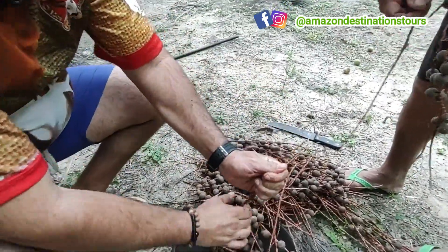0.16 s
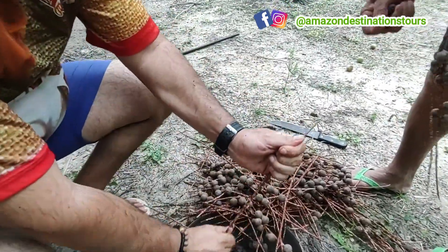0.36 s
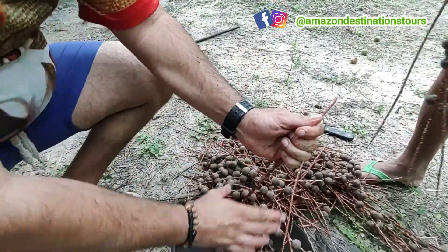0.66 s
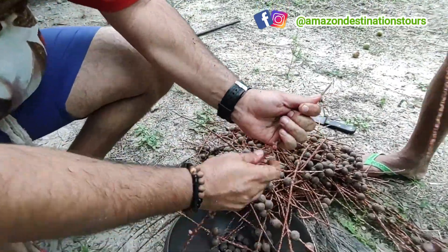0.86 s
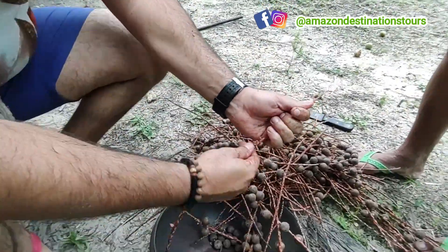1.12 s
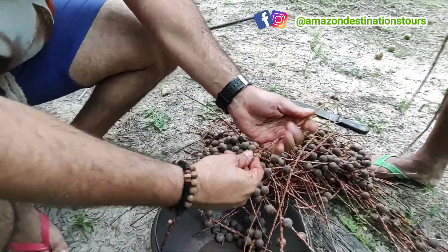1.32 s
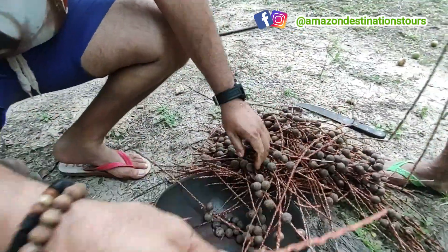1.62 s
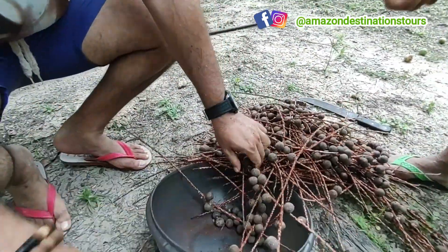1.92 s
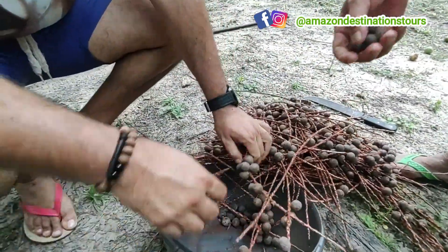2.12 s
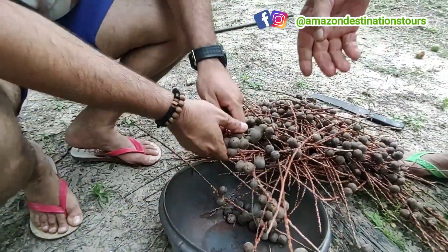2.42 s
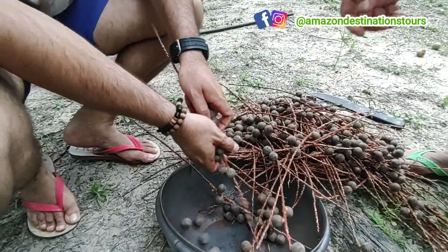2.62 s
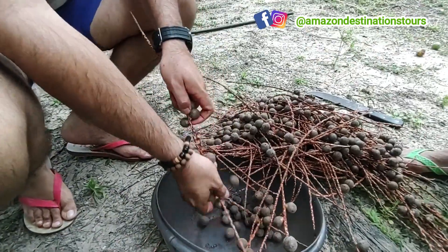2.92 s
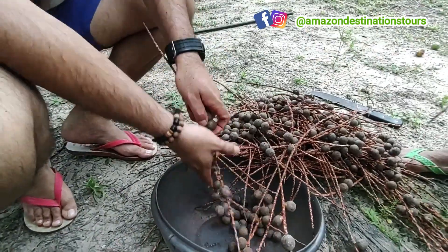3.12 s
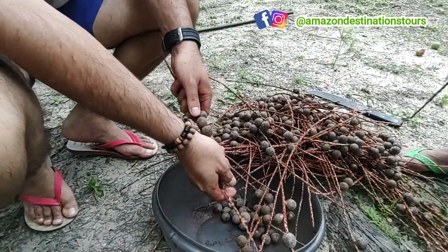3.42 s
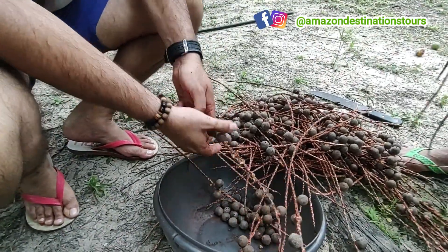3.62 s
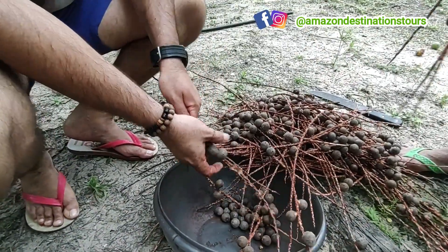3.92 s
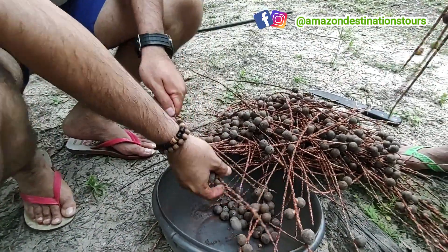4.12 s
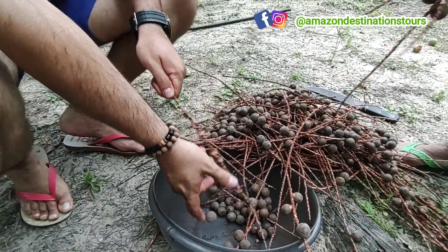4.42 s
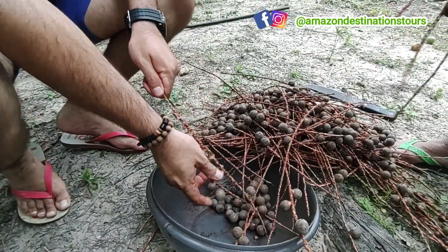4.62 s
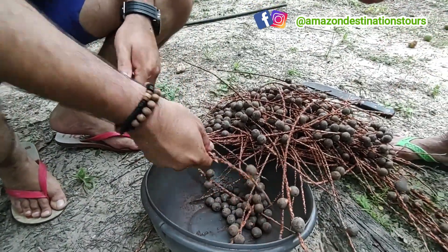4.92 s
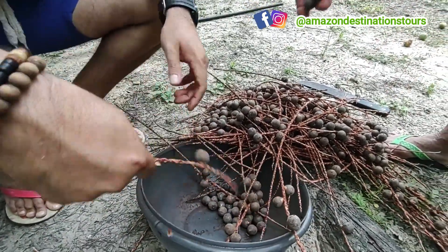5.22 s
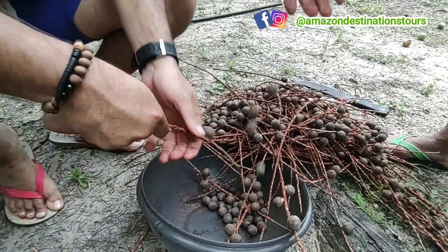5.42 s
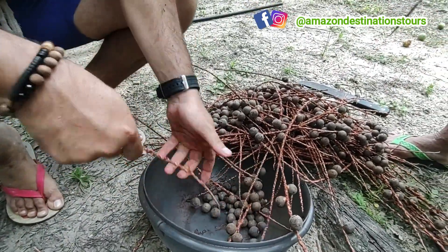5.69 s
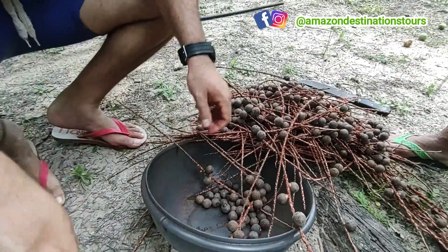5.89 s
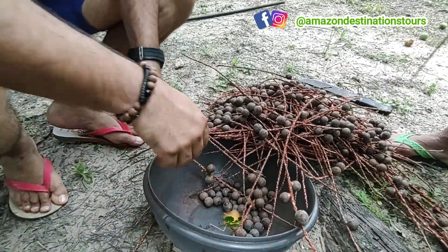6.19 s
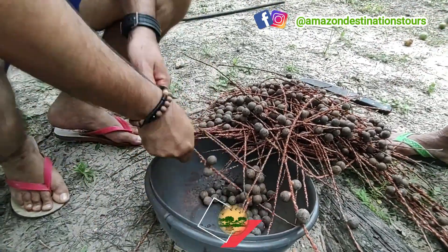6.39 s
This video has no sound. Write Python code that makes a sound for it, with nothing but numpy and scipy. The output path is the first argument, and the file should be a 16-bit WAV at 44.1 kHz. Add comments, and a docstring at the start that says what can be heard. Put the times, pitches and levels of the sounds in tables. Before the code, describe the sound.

Small hard fruits patter into a plastic bucket close by, each giving a short hollow knock, then bouncing and rolling. The first flurry runs from the start to about 0.7 seconds, with low handling thumps and a soft swish of stalk. A lull follows with a few small snaps, and a stalk taps and scrapes lightly over the rim around 1.8 seconds. A sharp snap and rasp come at 2.3. The longest shower of fruit falls from 2.6 to 3.7 seconds. Stalks swish and crackle around 4.2, then more fruits land from 4.6 to 5.1 and from 5.7 to 6.1, leaving a few faint ticks.

The hand-held stereo microphone has a finger over its left side, which sounds muffled, with rumble and small skin scratches; it opens briefly from about 1.6 to 2 seconds. Faint, distant outdoor air rustles throughout.

```python
"""Small hard fruits drop, bounce and roll in a plastic bucket, each landing ringing its wall.
They are stripped from a bunch by hand, outdoors: stalks snap and swish close to a hand-held stereo
recorder, one drags over the rim, and the open air rustles faintly far off. A finger covers the left
microphone port: that side is muffled and full of handling rumble, and opens for a moment when the
finger slides off."""
import sys
import numpy as np
from scipy import signal
from scipy.fft import rfft, irfft, next_fast_len
from scipy.io import wavfile
from scipy.ndimage import uniform_filter1d, map_coordinates

SR = 44100
rng = np.random.default_rng(int(sys.argv[2]) if len(sys.argv) > 2 else 0)


def unload_wav(signal):
    """Save mono or channel-first audio to the path in sys.argv[1] as 16-bit WAV at rate SR, clipped to [-1, 1]."""
    wavfile.write(
        sys.argv[1],
        SR,
        np.round(np.clip(np.atleast_2d(signal).T, -1, 1) * 32767).astype(np.int16),
    )


N = 288855

# Fruits landing. Each row: start in seconds, level in dB, favoured ring in Hz, hardness (treble) in dB.
LANDINGS = [(0.035, -17.5, 926, -1.5), (0.084, -23, 1190, 0.5), (0.11, -9, 1370, 2), (0.116, -14, 1180, 11),
            (0.127, -10.5, 1190, -6), (0.15, -8.5, 1000, 5), (0.184, -9, 1240, 4.5),
            (0.235, -22.5, 1070, 5.5), (0.255, -21, 940, 2.5), (0.265, -15.5, 1120, -2.5),
            (0.322, -22.5, 860, 2), (0.348, -12, 1330, -4.5), (0.356, -18.5, 1004, 6),
            (0.402, -25, 793, -4), (0.437, -20, 1150, 6), (0.459, -22, 950, -13), (0.616, -15.5, 1180, 0.5),
            (0.718, -14.5, 850, -7), (0.783, -37, 970, 1), (0.807, -38, 500, 2), (1.199, -38.5, 1730, 26),
            (2.606, -32, 1040, 8.5), (2.64, -20, 1230, 1), (2.655, -10, 760, -5.0), (2.682, -10, 1190, 7),
            (2.746, -20, 1220, -6), (2.754, -9, 878, 2), (2.801, -11.5, 1260, 0), (2.827, -20, 475, -11),
            (2.845, -28.5, 900, -14.5), (2.878, -30.5, 1150, -8), (2.893, -24, 920, -13.5),
            (2.939, -28.5, 455, -9.5), (2.959, -32.5, 920, 1.5), (3.016, -8, 850, 5.5),
            (3.039, -31.5, 703, 2.5), (3.067, -31.5, 681, -0.5), (3.113, -6, 852, 13),
            (3.124, -12.5, 866, -2), (3.173, -14.5, 785, -10), (3.193, -9.5, 983, 4),
            (3.271, -16.5, 986, -12), (3.308, -18.5, 860, -18.5), (3.331, -4, 900, 5),
            (3.352, -18, 780, -9), (3.382, -5, 876, -3), (3.421, -17, 760, -2), (3.449, -14, 970, -1),
            (3.474, -21.5, 880, 2), (3.486, -14, 944, -20.5), (3.521, -22, 1340, -18),
            (3.543, -22.5, 506, -8.5), (3.584, -14.5, 975, -21), (3.628, -17, 1290, 5.5),
            (3.655, -14.5, 1000, -13.5), (3.695, -29, 880, -22), (3.894, -36, 880, -23),
            (4.333, -22.5, 925, 0.5), (4.386, -28, 1150, -17), (4.549, -41, 774, -1),
            (4.611, -19.5, 1270, 16), (4.666, -28, 890, 0.5), (4.68, -7.5, 764, 11.5),
            (4.708, -16.5, 870, -5), (4.775, -19, 500, -5), (4.814, -19, 820, -32),
            (4.833, -25, 920, -16.5), (4.851, -15.5, 670, -6.5), (4.873, -4, 785, 12), (4.926, -24, 835, 2),
            (4.976, -19, 860, -11.5), (5.082, -18.5, 720, -20), (5.128, -23.5, 725, -23),
            (5.692, -19, 1340, 3), (5.702, -10, 1180, 7.5), (5.713, -15, 845, 11), (5.733, -14.5, 925, 3.5),
            (5.763, -16, 812, -7), (5.816, -14, 970, -4), (5.839, -20, 930, -0.5), (5.872, -11.5, 835, -29),
            (5.911, -15, 930, -18.5), (5.936, -14, 1270, -12.5), (5.961, -27.5, 890, -7),
            (6.015, -23.5, 1290, 3.5), (6.108, -33, 1235, -8), (6.151, -38, 840, -13),
            (6.452, -48, 810, -2), (6.477, -39.5, 873, -17)]
# The bucket's modes. Each row: pitch in Hz, level in dB, 60 dB decay in seconds (limited in bucket_ring).
BUCKET_MODES = [(234, 2.5, 0.013), (370, -8, 0.019), (489, 14, 0.037), (688, 3.5, 0.014), (926, 4.5, 0.024),
                (1250, 7, 0.013), (1770, 1, 0.0048), (2296, -8.5, 0.0033), (2840, -4.5, 0.0065),
                (3475, -9, 0.015), (4070, -33.5, 0.017)]
# Tone of a rounded contact on a small radiator. Each row: frequency in Hz, gain in dB.
CONTACT_TONE = [(40, -26.5), (160, -24), (230, -5), (300, -1.5), (2200, 10), (3300, -10), (4500, -5.5),
                (8000, -34.5)]
# Short sharp clicks: stalks snapping, and fruits cracking or ticking as they land.
# Each row: start in seconds, level in dB, woody part relative to that in dB.
SHARP_CLICKS = [(0.133, -40, 18.5), (0.151, -34, 0.5), (0.4102, -36, -8.5), (0.4325, -33, -11),
                (0.4579, -40, -23), (0.884, -52, 10.5), (1.016, -52.5, 9.5), (1.1987, -46, 8),
                (1.228, -38.5, -19), (1.853, -40.5, 0), (1.916, -43, -27), (2.28, -25.5, -3.5),
                (2.633, -37.5, -20.5), (2.701, -35.5, -20.5), (2.7934, -38, -8.5), (2.908, -32.5, -16),
                (2.9302, -36, -7), (2.954, -38.5, -10), (2.9786, -38, -18.5), (3.0826, -38, -22.5),
                (3.4707, -34.5, -0.5), (4.1476, -34, -8), (4.1684, -40.5, -14.5), (4.1898, -31.5, -26),
                (4.2061, -34, -25), (4.464, -45, -31), (4.8535, -35.5, -28), (5.1506, -43, 0.5),
                (5.671, -28, -20), (6.225, -52, 13), (6.245, -50.5, 11), (6.288, -52, 4.5)]
# Stalks pulled through fingers. Each row: loudest moment in seconds, level in dB, swell and fade in seconds.
STALK_PULLS = [(0.48, -49, 0.088, .2), (1.44, -62, 0.15, .27), (2.282, -45.5, .004, 0.06),
               (2.99, -45, .08, 0.18), (4.25, -48.5, 0.13, .2), (4.471, -56, 0.011, .12),
               (4.89, -50, .004, 0.16), (5.676, -50.5, 0.0043, .14), (6.27, -67, 0.047, .1)]
# Tone of the swish. Each row: frequency in Hz, gain in dB.
SWISH_TONE = [(1500, -31), (5000, -22), (9000, -25.5), (12000, -8), (14000, -6), (16000, -8)]
# A stalk tapping the rim. Each row: start in seconds, level in dB, favoured ring in Hz.
RIM_TAPS = [(1.748, -45, 950), (1.788, -41.5, 1260), (1.821, -42.5, 1330), (1.838, -41, 1370),
            (1.854, -43, 1420)]
# The finger on the left port. Each row: time in seconds, share covered from 0 to 1.
PORT_COVER = [(0, 1), (1.52, 0.99), (1.66, 0.032), (1.95, 0.083), (2.0, 0.94), (6.55, 0.98)]
# Sound let under the finger as its pressure changes. Each row: time in seconds, gain in dB.
FINGER_LEAK = [(0, -1), (.35, -4), (.72, 3.5), (2.6, 7.5), (2.82, 7.5), (3.0, 1.5), (3.4, 2), (4.7, -1),
               (4.87, 4), (5.0, -2)]
# The left port covered, then half freed. Each row: frequency in Hz, gain in dB.
COVERED_TONE = [(30, 0.5), (200, -2), (500, -6.5), (1500, -11.5), (2500, -21.5), (3300, -10), (5000, -25),
                (8000, -58), (16000, -42.5)]
FREED_TONE = [(300, 6.5), (3000, 6.5), (7000, -1), (16000, -15.5)]
# The hand shifting on the recorder. Each row: loudest moment in seconds, rumble level in dB.
HAND_SHIFTS = [(.03, -24), (.32, -30.5), (.37, -32), (.42, -17.5), (.64, -35), (1.18, -38.5), (1.45, -35.5),
               (1.57, -28), (2.86, -35.5), (3.78, -38.5), (4.41, -39.5), (4.83, -29.5), (4.97, -42),
               (5.19, -48.5), (5.73, -44.5), (6.11, -35.5)]
# Pushes of air trapped under the finger in the left port. Each row: start in seconds, level in dB, time
# constant in seconds.
PORT_PUSHES = [(0.315, -6.5, 0.00081), (0.363, -9.5, 0.00075), (0.559, -20, 0.0015), (0.894, -25.5, 0.0016),
               (0.946, -29, 0.0019), (1.085, -35, 0.0022), (1.165, -22.5, 0.0014), (1.339, -28, 0.001),
               (1.564, -19.5, 0.00046), (1.615, -17, 0.0012), (1.636, -17, 0.00036), (1.643, -3.5, 0.00044),
               (1.974, -33, 0.00057), (2.011, -32.5, 0.0031), (2.458, -29, 0.00043), (2.471, -18, 0.00018),
               (2.477, -17.5, 0.00036), (3.768, -23, 0.00062), (5.556, -42.5, 0.0025),
               (5.931, -14.5, 0.00066), (5.984, -18, 0.0018)]
# Tone of the rumble in the case. Each row: frequency in Hz, gain in dB.
CASE_TONE = [(15, -54.5), (45, -1.5), (80, 3), (130, -8), (220, -20), (400, -31.5), (1000, -40.5),
             (3000, -86.5)]
# Tone of the distant air. Each row: frequency in Hz, gain in dB.
AIR_TONE = [(20, -18.5), (80, -7), (200, -1), (1000, 2), (2200, -0.5), (3300, -5.5), (7000, -9.5),
            (12000, -12.5), (16000, -10)]


def fruit_landings():
    """Each fruit rings the bucket; a hard contact wakes the high modes and cracks."""
    wall, cracks = np.zeros((2, N)), np.zeros((2, N))
    for start, db, peak_hz, hard_db in LANDINGS:
        knock_db = -9 + 2 * rng.standard_normal()
        blow = bucket_ring(peak_hz, knock_db, hard_db, focus_db=7, spread_db=2, stereo_phase=1.1)
        add(wall, start - .001, amp(db) * blow)
        add(cracks, start, amp(db + 0.8 * hard_db - 21.5) * burst(t60_s=0.029, rise_s=0.001))
    crack_tone = [(300, -73), (2500, 7), (4000, 2), (8000, -13.5), (16000, -23.5)]
    return coloured(wall, CONTACT_TONE) + coloured(cracks, crack_tone)


def bucket_ring(peak_hz, low_db, high_db, focus_db, spread_db, stereo_phase):
    """One blow on the bucket at both ports; the spot hit sets one mode to peak_hz and weights it."""
    t = np.arange(SR // 8) / SR
    hz, db, t60 = np.transpose(BUCKET_MODES)[:, :, None]
    t60 = t60.clip(.01, .036)
    detune, scatter, phase = rng.standard_normal((3, len(hz), 1))
    nearest = np.argmin(np.abs(hz - peak_hz))
    hz = hz * (1 + 0.028 * detune)  # the load of fruit and the spot detune the wall
    hz[nearest] = peak_hz
    treble = np.clip(np.log(hz / 1300) / 0.44, 0, 1)
    db = db + spread_db * scatter + low_db * (hz < 620) + high_db * treble
    db -= 4 * (hz > 620) * (hz < .85 * peak_hz)  # middle modes under the favoured one move less
    decay = amp(db - 60 * t / t60)
    left_phase = stereo_phase * np.sqrt(hz / 1000) * phase
    modes = np.array([decay * np.sin(2 * np.pi * hz * t + shift) for shift in (left_phase, 0)])
    wall = modes.sum(axis=1)
    spot = wall + amp(focus_db) * modes[:, nearest]
    # after the blow the fruit chatters on its neighbours, then the loose heap rattles on
    blow = np.exp(-((t - .0006) / .00015) ** 2) / 14
    chatter = amp(-25.5) * np.exp(-((t - .003) / 0.0038) ** 2) * rng.standard_normal(len(t))
    rattle = amp(-35 - 60 * t / 0.11) * rng.standard_normal(len(t))
    pair = sum(signal.fftconvolve(body, push[None], axes=1)[:, :len(t)]
               for body, push in ((spot, blow + chatter), (wall, rattle)))
    return pair / pair[:, :SR // 80].std(axis=1, keepdims=True) / 3.1  # peak near 1


def heap_patter():
    """Every landing sets the heap bouncing and rolling: many small contacts, a few strong, at five spots."""
    contacts_per_s, roll_t60_s = 70, 0.37
    patter = np.zeros((2, N))
    for peak_hz in (523, 891, 1180, 1488, 1870):
        hits = rng.random(N) < contacts_per_s / SR
        blows = hits * amp(3.5 * rng.exponential(size=N).clip(0, 3))
        ring = bucket_ring(peak_hz, low_db=-5, high_db=5, focus_db=-3, spread_db=3, stereo_phase=.9)
        patter += signal.fftconvolve(blows[None], ring, axes=1)[:, :N]
    stirs = [(start, -23 + 0.78 * db) for start, db, *_ in LANDINGS]
    power = swells(stirs, rise_s=0.0035, fall_s=roll_t60_s / np.log(1000) / 2)
    return np.sqrt(power) * unit(coloured(patter, CONTACT_TONE))


def sharp_clicks():
    """Stalks snap, and fruits crack or tick as they land: a bright puff of noise with a woody part."""
    bright, wood = np.zeros((2, N)), np.zeros((2, N))
    for start, db, wood_db in SHARP_CLICKS:
        add(wood, start, amp(db + wood_db) * burst(t60_s=.022, rise_s=.0002))
        add(bright, start, amp(db) * burst(t60_s=.022, rise_s=.0002))
    bright_tone = [(1500, -33.5), (4500, -9), (7000, -2.5), (16000, 1.5)]
    wood_tone = [(600, -20.5), (1600, 7), (2500, 4), (5000, 3), (9000, -16)]
    return coloured(bright, bright_tone) + coloured(wood, wood_tone)


def stalk_swish():
    """Close up, stalks rasp through the fingers; a fading pull keeps only its top."""
    pull, firm = np.zeros(N), np.zeros(N)
    for loudest, db, rise, fall in STALK_PULLS:
        force = curve([(loudest - rise, 0), (loudest, 1), (loudest + fall, 0)])
        pull += amp(db) * force ** 0.48
        firm += amp(db) * force ** 2.7
    firm_tone = [(2500, -15.5), (5500, -10.5), (8000, -3), (11000, -7), (14000, -3)]
    return pull * rasp(SWISH_TONE, patchy_db=3.5) + amp(5.5) * firm * rasp(firm_tone, patchy_db=0)


def rasp(tone, patchy_db):
    """Stalk on skin: grainy noise of rms 1, with ticks and random patches in time and pitch."""
    catches = (rng.random(N) < 250 / SR) * rng.exponential(size=N)
    ticks = signal.lfilter([1], [1, -.985], catches)
    spectra = signal.stft(rng.standard_normal((2, N)) * (1 + 1.8 * ticks), nperseg=256)[2]
    patches = uniform_filter1d(rng.standard_normal(spectra.shape[1:]), 9, axis=0)
    patches = unit(uniform_filter1d(patches, 6, axis=1))
    grain = signal.istft(spectra * amp(patchy_db * patches), nperseg=256)[1][:, :N]
    return unit(coloured(grain, tone))


def rim_drag():
    """A stripped stalk drags over the rim: light taps, mostly on one mode, over a soft scrape."""
    taps = np.zeros((2, N))
    for start, db, peak_hz in RIM_TAPS:
        tap = bucket_ring(peak_hz, low_db=-22, high_db=0, focus_db=10, spread_db=2, stereo_phase=.6)
        add(taps, start - .001, amp(db) * tap)
    power = swells([(start, db - 16.5) for start, db, _ in RIM_TAPS], rise_s=0.019, fall_s=0.019)
    scrape = unit(coloured(rng.standard_normal((2, N)), [(500, -18), (1300, 4), (3000, -20)]))
    return coloured(taps, CONTACT_TONE) + np.sqrt(power) * scrape


def handling():
    """Rumble and pushes of pressure trapped in the left port; skin scratches as the finger slides off."""
    still_hand_db = -52.5
    cover = curve(PORT_COVER)
    rumble = coloured(rng.standard_normal(N), CASE_TONE)
    rumble_power = np.abs(uniform_filter1d(rumble ** 2, size=SR // 25))
    rumble = unit(amp(2.2 * wobble(12)) * rumble / rumble_power ** 0.2)
    shifting = swells(HAND_SHIFTS, rise_s=0.0155, fall_s=0.019)
    resting = amp(2 * still_hand_db) * cover.clip(0, 1) ** 2
    left = np.sqrt(shifting + resting) * rumble
    for start, db, time_constant in PORT_PUSHES:
        age = np.arange(SR // 20) / SR / time_constant
        add(left, start, -amp(db) * age ** 2 * (3 - age) * np.exp(-age))
    lift_speed = uniform_filter1d(np.clip(-np.gradient(cover) * SR, 0, None), size=SR // 40)
    skin = rng.standard_normal(N) * amp(8 * wobble(300))
    scratch = coloured(skin, [(100, 12.5), (500, -6.5), (2500, -15), (5000, -72.5)])
    left += amp(-49.5) * lift_speed * unit(scratch)
    return np.array([left, np.zeros(N)])


def open_air():
    """Far rustle of the open air, drifting slightly in level, most alike at both ports in the bass."""
    shared, separate = rng.standard_normal(N), rng.standard_normal((2, N))
    air = separate + coloured(shared, [(60, 14.5), (300, -9), (700, -19), (2000, -4.5)])
    drift = amp(.8 * wobble(3))
    return amp(-57.5) * drift * unit(coloured(air, AIR_TONE))


def burst(t60_s, rise_s):
    """A short puff of noise for both ports."""
    t = np.arange(SR // 20) / SR
    return rng.standard_normal((2, len(t))) * amp(-60 * t / t60_s) * (1 - np.exp(-t / rise_s))


def swells(rows, rise_s, fall_s):
    """Power envelope: each (seconds, dB) row swells up to its time and fades after it."""
    t = np.arange(N) / SR
    return sum(amp(2 * db) * np.exp(np.minimum((t - s) / rise_s, (s - t) / fall_s)) for s, db in rows)


def coloured(x, tone):
    """x through a causal filter whose gain follows (Hz, dB) points on a log frequency axis."""
    size = 2 * next_fast_len(N // 2 + 4096)
    hz, db = np.transpose(tone)
    gain_db = np.interp(np.log(np.fft.rfftfreq(size, 1 / SR) + 1), np.log(hz + 1), db)
    cepstrum = irfft(np.log(amp(gain_db)), size)
    cepstrum[1:size // 2] *= 2  # fold for minimum phase
    cepstrum[size // 2 + 1:] = 0
    return irfft(rfft(x, size) * np.exp(rfft(cepstrum)), size)[..., :N]


def curve(rows):
    """One value per sample from (seconds, value) rows."""
    return np.interp(np.arange(N) / SR, *np.transpose(rows))


def wobble(rate):
    """A smooth random curve, rate knots a second."""
    return map_coordinates(rng.standard_normal(int(N * rate / SR) + 4), [np.arange(N) * rate / SR])


def add(track, start_s, sound):
    """Mix a short sound in at start_s."""
    k = max(round(start_s * SR), 0)
    track[..., k:k + sound.shape[-1]] += sound[..., :track.shape[-1] - k]


def amp(db):
    """Decibels to amplitude."""
    return 10 ** (np.asarray(db) / 20)


def unit(x):
    """x scaled to rms 1."""
    return x / np.sqrt(np.mean(x ** 2) + 1e-20)


def scene():
    """Bucket, stalks and air reach both ports; the finger fades the left between muffled and open."""
    bucket = fruit_landings() + heap_patter() + rim_drag()
    left, right = bucket + sharp_clicks() + stalk_swish() + open_air()
    cover = curve(PORT_COVER).clip(0, 1)
    muffled = amp(curve(FINGER_LEAK)) * coloured(left, COVERED_TONE)
    left = cover * muffled + (1 - cover) * coloured(left, FREED_TONE)
    return np.array([left, right]) + handling()


def record(dry):
    """The recorder adds faint hiss, rounds peaks near full scale and cuts the highest treble."""
    shelf_hz, cutoff_hz = 15800, 16600
    noisy = dry + amp(-79) * rng.standard_normal(dry.shape)
    rounded = noisy / (1 + np.abs(noisy / .98) ** 4) ** (1 / 4)
    hz = np.fft.rfftfreq(N, 1 / SR)
    return irfft(rfft(rounded) * np.where(hz < shelf_hz, 1, amp(-24)) * (hz < cutoff_hz), N)


dry = scene()
out = record(dry)
unload_wav(out)
```